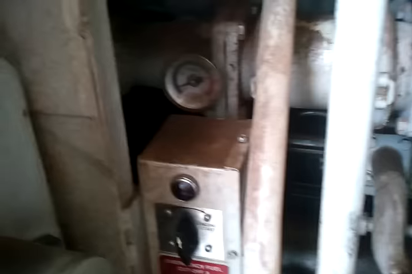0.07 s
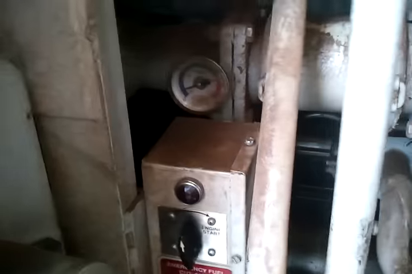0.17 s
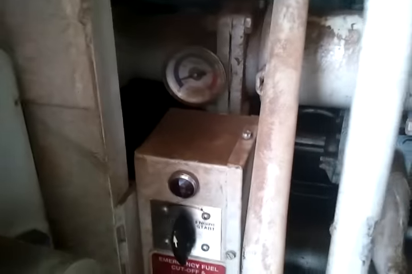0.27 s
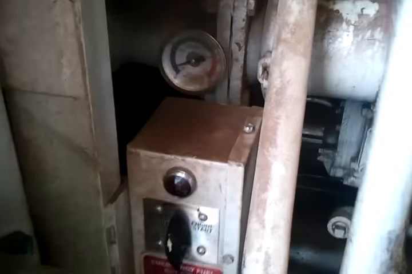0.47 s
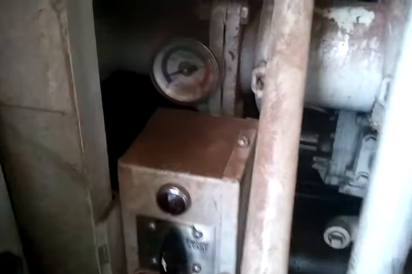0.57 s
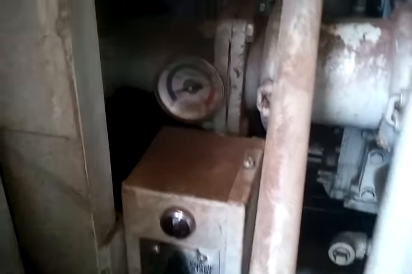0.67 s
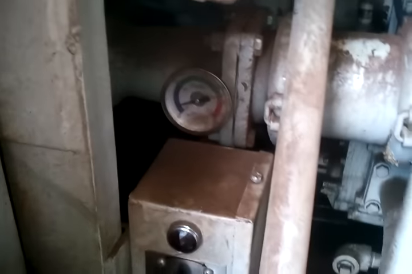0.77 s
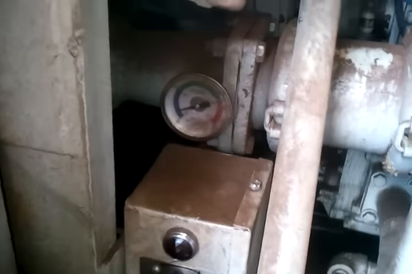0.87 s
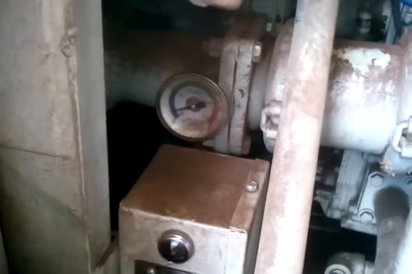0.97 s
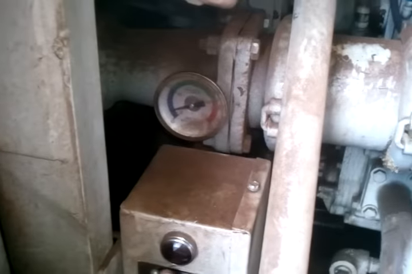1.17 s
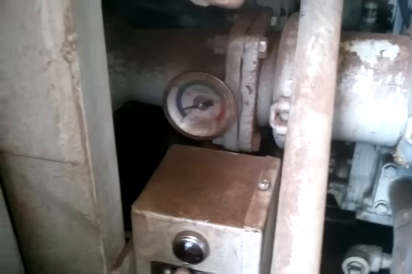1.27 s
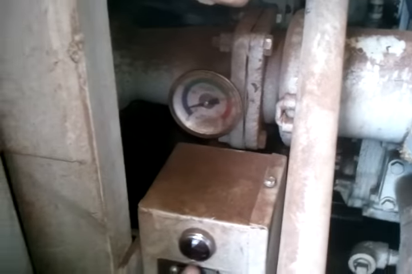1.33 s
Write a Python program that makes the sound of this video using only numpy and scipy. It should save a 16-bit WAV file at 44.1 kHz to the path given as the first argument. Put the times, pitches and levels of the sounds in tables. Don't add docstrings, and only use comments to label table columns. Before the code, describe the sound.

Diesel locomotive engine start-up; after brief silence a small mono microphone cuts abruptly into throbbing low hum and roaring pipes, then a dull knock, a latch squeal and a hissing, whining starter in a tight metal room.

```python
import sys
import numpy as np
from scipy import signal
from scipy.io import wavfile
from scipy.ndimage import uniform_filter1d

SR = 44100
rng = np.random.default_rng(int(sys.argv[2]) if len(sys.argv) > 2 else 0)


def file_out(sig):
    cols = np.atleast_2d(sig).T
    lim = np.clip(cols, -1, 1)
    pcm = np.round(lim * 32767).astype(np.int16)
    wavfile.write(sys.argv[1], SR, pcm)


def gain_from_db(level_db):
    decades = np.asarray(level_db, float) / 20
    return 10 ** decades


N = 128772
T = np.arange(N) / SR

OPEN_S, OPEN_RISE_S = 0.2043, 0.001

PUMP_HZ, PUMP_AT_S = 15.895, 1.5757
MOTOR_HZ, MOTOR_AT_S = 12.503, 1.5771
WAVER_DB, WAVER_RAD = 0.4, 0.04
KNOCK_RAD, FRAME_HZ, FRAME_RAD = -1.5, 120, 2.0
PUMP_ORDERS_DB = [-64, -45, -58.5, -58, -42.5, -54.5, -56, -47, -52.5, -62, -56, -52.5, -56, -83, -48, -66,
                  -72, -53.5, -54, -54, -69, -49.5, -59, -64, -57.5, -55.5, -80, -72, -79]
GEAR_ORDERS_DB = [-57.5, -86, -65.5, -62, -56, -56, -60.5, -60.5, -72.5, -57, -63.5, -64.5, -56, -84, -87,
                  -107, -52, -63, -64.5, -57]
MOTOR_ORDERS_DB = [-59, -61, -32.5, -92, -52.5, -60, -37, -55, -70, -48.5, -55, -97, -63, -72, -54.5]

# (frequency [Hz], density [dB per Hz])
RUMBLE_SPECTRUM = [(15, -68), (30, -68), (55, -72), (75, -62), (110, -83), (150, -65.5), (260, -73),
                   (420, -70)]
# (frequency [Hz], density [dB per Hz])
ROAR_SPECTRUM = [(480, -78), (800, -75.5), (1150, -74.5), (2300, -73.5), (2800, -81.5), (5200, -82.5),
                 (10000, -83), (14500, -102)]
# (frequency [Hz], width [Hz], lift [dB])
PANEL_RINGS = [(710, 36, 2), (896, 40, 0.5), (1527, 220, 4.5), (1884, 343, 9.5), (2224, 160, 5.5),
               (3217, 195, 5), (3705, 110, 5.5), (4330, 160, 1.5), (6040, 146, 7.5), (6700, 620, 6),
               (9400, 600, 1), (11570, 800, 4)]
# (frequency [Hz], width [Hz], level [dB])
SINGING_PARTS = [(985, 5.2, -58), (1036, 4, -63.5), (1120, 5.4, -64), (1232, 7, -56), (1474, 10, -51),
                 (1810, 23, -52.5), (1936, 15, -53), (2297, 16, -56.5), (2623, 8.1, -61)]
# (time [s], level [dB])
ROAR_COURSE = [
    (0.2, 1.5),
    (0.7, 0.5),
    (1.2, -0.5),
    (1.9, 0),
    (2.9, 0.5),
]
THUD_DB, PATCH_DB, FLICKER_DB, STROKE_DB = 1.2, 1.0, 0.5, 0.38
TICKS_PER_S, TICK_DB, TICK_SPREAD_DB = 700, -54, 2

BUMP_S, BUMP_RISE_S, BUMP_T60_S = 1.538, 0.009, 0.2
# (frequency [Hz], level [dB])
BUMP_RINGS = [(152, -38), (365, -41), (400, -38), (75, -46)]

LATCH_S, LATCH_RISE_S, LATCH_HOLD_S, LATCH_T60_S = 1.985, 0.01, 0.022, 0.12
LATCH_HISS_DB, CHATTER_DB, CHATTER_HZ = -37.5, 1.5, 198.0
# (frequency [Hz], width [Hz], level [dB])
SQUEAL_RINGS = [(1920, 110, -37), (3850, 200, -50), (5100, 200, -50), (5800, 300, -44), (7200, 300, -49),
                (9000, 350, -48), (10800, 300, -52), (11570, 250, -47), (12700, 500, -47)]

# (time [s], level [dB])
STARTER_EFFORT = [
    (2.03, -36),
    (2.1, -18),
    (2.14, -1),
    (2.22, -1.5),
    (2.4, -.5),
    (2.56, .5),
    (2.68, 1.5),
    (2.78, 1),
    (2.92, 0),
]
# (frequency [Hz], density [dB per Hz])
HISS_SPECTRUM = [(900, -88), (1400, -75.5), (2200, -71.5), (2600, -78), (4000, -77.5), (5700, -78.5),
                 (9500, -80), (13500, -102)]
# (frequency [Hz], width [Hz], lift [dB])
HISS_PEAKS = [(3220, 150, 3), (5600, 140, 6), (6070, 100, 5), (7860, 90, 2), (8500, 350, 1),
              (4740, 190, -7), (7630, 340, -10), (10500, 250, 2)]
# (frequency [Hz], level [dB])
WHINE_TONES = [(1335, -56), (1599, -52), (1701, -53), (1766, -53), (1830, -46), (2073, -50), (2096, -49),
               (2191, -47), (2369, -56), (2638, -58)]
SURGE_HZ, SURGE_AT_S, SURGE_DB = 4.8, 2.16, 1.8
WHINE_GROW_DB_PER_S = 0.5

# (frequency [Hz], threshold over the bin's usual level [dB])
GATE_THRESHOLD = [(8000, -20), (10300, -11), (11600, -5), (12100, 2.5), (13000, 4.5), (13700, 5.5),
                  (14000, 8), (15000, 9.5)]
GATE_MAKEUP_DB = 11.0


def evened(x):
    return x / np.sqrt(np.mean(x ** 2) + 1e-20)


def curve(points, t):
    return np.interp(t, *np.transpose(points))


def wander(rate_hz, count=20):
    t = T[::64]
    hz = np.geomspace(rate_hz / 20, rate_hz, count)[:, None]
    sines = np.sin(2 * np.pi * (hz * t + rng.random(hz.shape))) / np.sqrt(hz)
    return np.interp(T, t, evened(sines.sum(0)))


def noise(points, rings, patch_db, flicker_db, size=512):
    hop = size // 4
    frames, hz = N // hop + 5, np.fft.rfftfreq(size, 1 / SR) + 1
    real, imag, patch = rng.standard_normal((frames, len(hz), 3)).T
    patch = uniform_filter1d(patch, size=max(size // 60, 2), axis=0)
    patch = evened(uniform_filter1d(patch, size=12, axis=1))
    flicker = evened(uniform_filter1d(rng.standard_normal(frames), size=10))

    point_hz, point_db = np.transpose(points)
    colour_db = np.interp(np.log(hz), np.log(point_hz), point_db)
    colour_db = colour_db - 30 * abs(np.log2(hz / np.clip(hz, point_hz[0], point_hz[-1])))
    colour_db = colour_db + sum(lift_db * np.exp(-2 * ((hz - centre_hz) / width_hz) ** 2)
                                for centre_hz, width_hz, lift_db in rings)
    power = np.sum(gain_from_db(colour_db) ** 2) * SR / size

    gain = gain_from_db(colour_db[:, None] + patch_db * patch + flicker_db * flicker)
    x = signal.istft((real + 1j * imag) * gain, nperseg=size, noverlap=size - hop)[1][:N]
    return evened(x) * np.sqrt(power)


def sing(parts):
    out = np.zeros(N)
    for hz, width_hz, db in parts:
        pole = np.exp(-np.pi * width_hz / SR)
        z = rng.standard_normal((N, 2)) @ [1, 1j]
        z = signal.lfilter([1], [1, -pole ** 2], z)
        z = signal.lfilter([1], [1, -pole], z)
        out += gain_from_db(db) * evened((z * np.exp(2j * np.pi * hz * T)).real)
    return out


def orders(shaft_hz, at_s, levels_db, first, count, knock_rad, flip_rad=0.0):
    turn_rad = 2 * np.pi * shaft_hz * (T - at_s) + WAVER_RAD / 20 * wander(2.3)
    out = np.zeros(N)
    for k, db in enumerate(levels_db, first):
        if k % count:
            lead_rad = knock_rad[k - first]
        else:
            lead_rad = flip_rad * (k * shaft_hz > FRAME_HZ)
        level = gain_from_db(db + WAVER_DB * wander(5.5, count=6))
        out -= np.sqrt(2) * level * np.cos(k * turn_rad + lead_rad)
    return out


def pump():
    knock_rad = KNOCK_RAD + 0.5 * rng.standard_normal(len(PUMP_ORDERS_DB))
    gear_rad = 2 * np.pi * rng.random(len(GEAR_ORDERS_DB))
    shaft = orders(PUMP_HZ, PUMP_AT_S, PUMP_ORDERS_DB, 2, 3, knock_rad, FRAME_RAD)
    return shaft + orders(PUMP_HZ, PUMP_AT_S, GEAR_ORDERS_DB, 40, 99, gear_rad)


def motor():
    return orders(MOTOR_HZ, MOTOR_AT_S, MOTOR_ORDERS_DB, 2, 1, [])


def valve_ticks():
    size = gain_from_db(TICK_SPREAD_DB * np.minimum(rng.exponential(1, N), 5))
    size = size * (rng.random(N) < TICKS_PER_S / SR)
    t = np.arange(400) / SR
    tick = sum(np.sin(2 * np.pi * hz * t) * gain_from_db(-60 * t / 0.005) for hz in (1900.0, 6400.0, 10500.0))
    impulses = size * rng.choice([-1, 1], N)
    return gain_from_db(TICK_DB) * evened(signal.oaconvolve(impulses, tick)[:N])


def roar():
    stroke = gain_from_db(STROKE_DB * np.cos(2 * np.pi * 3 * PUMP_HZ * (T - PUMP_AT_S)))
    panels = noise(ROAR_SPECTRUM, PANEL_RINGS, PATCH_DB, FLICKER_DB, size=1024)
    body = (panels + valve_ticks()) * stroke + sing(SINGING_PARTS)
    rumble = noise(RUMBLE_SPECTRUM, [], THUD_DB, THUD_DB / 2, size=2048)
    return body * gain_from_db(curve(ROAR_COURSE, T)) + rumble


def bump():
    u = np.maximum(T - BUMP_S, 0)
    shape = np.minimum(u / BUMP_RISE_S, 1) * gain_from_db(-60 * u / BUMP_T60_S)
    return shape * sum(gain_from_db(db) * np.sin(2 * np.pi * hz * u) * 2 for hz, db in BUMP_RINGS)


def latch():
    u = np.maximum(T - LATCH_S, 0)
    decay_s = np.maximum(u - LATCH_RISE_S - LATCH_HOLD_S, 0)
    shape = np.minimum(u / LATCH_RISE_S, 1) * gain_from_db(-60 * decay_s / LATCH_T60_S)
    highpass = signal.butter(4, 3500, "highpass", fs=SR, output="sos")
    hiss = evened(signal.sosfilt(highpass, rng.standard_normal(N)))
    squeal = shape * (sing(SQUEAL_RINGS) + gain_from_db(LATCH_HISS_DB) * hiss)
    squeal = squeal * gain_from_db(CHATTER_DB * wander(CHATTER_HZ))
    lowpass = signal.cheby2(10, 60, 14300, fs=SR, output="sos")
    return signal.sosfilt(lowpass, squeal)


def starter():
    surge_db = SURGE_DB * np.cos(2 * np.pi * SURGE_HZ * (T - SURGE_AT_S))
    effort_db = curve(STARTER_EFFORT, T) - 99 * (T < STARTER_EFFORT[0][0])
    whine = np.zeros(N)
    for hz, db in WHINE_TONES:
        level = np.sqrt(2) * gain_from_db(db + 3.2 * wander(25.12))
        whine += level * np.sin(2 * np.pi * hz * T + 1.44 * wander(16.0))
    whine = whine * gain_from_db(1.6 * surge_db + WHINE_GROW_DB_PER_S * (T - 2.5))
    hiss = noise(HISS_SPECTRUM, HISS_PEAKS, 1.3, 0.35) * gain_from_db(0.3 * surge_db)
    return gain_from_db(effort_db) * (hiss + whine)


def scene():
    return np.tile(pump() + motor() + roar() + bump() + latch() + starter(), (2, 1))


def gate(x):
    window = np.sin(np.pi * (np.arange(2048) + 0.5) / 2048)
    hz, _, z = signal.stft(x, SR, window, nperseg=2048, noverlap=1024)
    power = abs(z) ** 2
    usual = uniform_filter1d(uniform_filter1d(power, size=31, axis=1), size=61, axis=2)
    over_db = np.interp(hz, *np.transpose(GATE_THRESHOLD), left=-99)[:, None]
    is_open = power > usual * gain_from_db(2 * over_db)
    makeup = gain_from_db(GATE_MAKEUP_DB * np.clip((over_db + 4) / 10, 0, 1))
    return signal.istft(z * is_open * makeup, SR, window, nperseg=2048, noverlap=1024)[1][:, :N]


def low_pass(x):
    return signal.sosfilt(signal.butter(12, 14990, fs=SR, output="sos"), x)


def record(dry):
    opening = np.clip((T - OPEN_S) / OPEN_RISE_S, 0, 1)
    return low_pass(gate(dry) * opening)


dry = scene()
out = record(dry)
file_out(out)
```